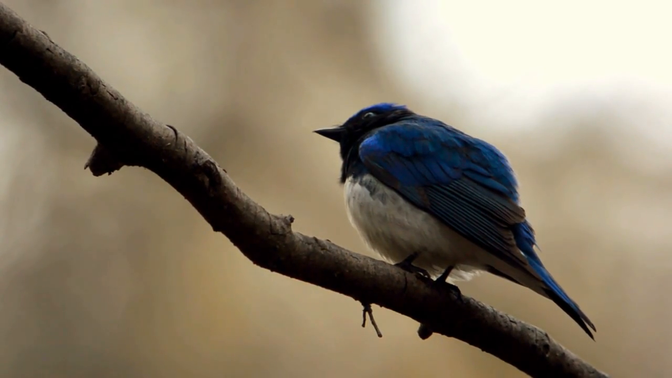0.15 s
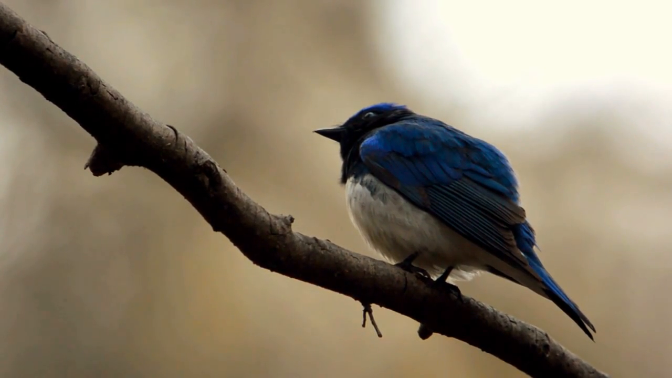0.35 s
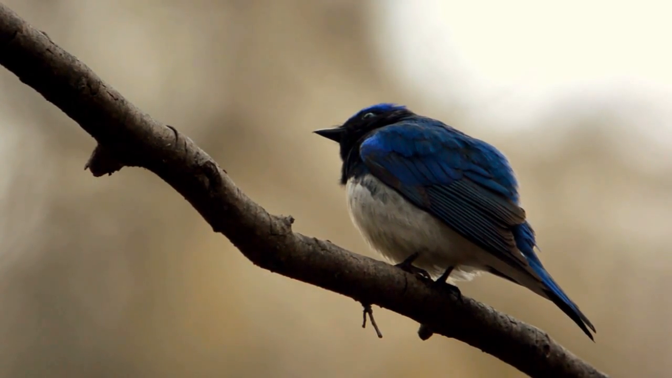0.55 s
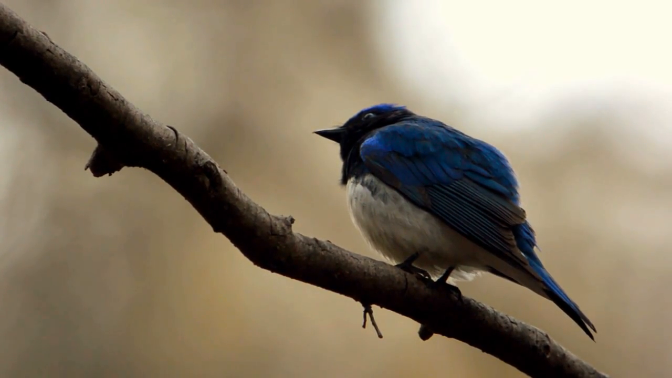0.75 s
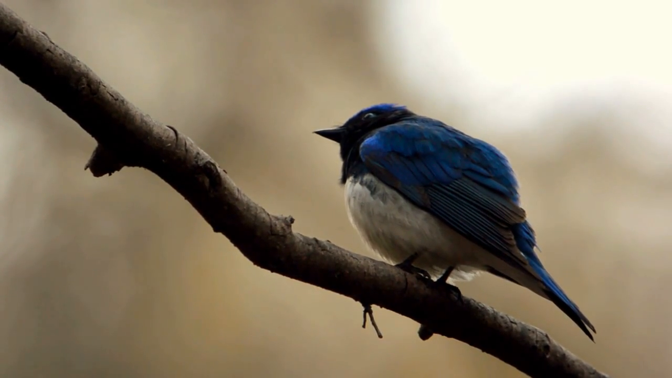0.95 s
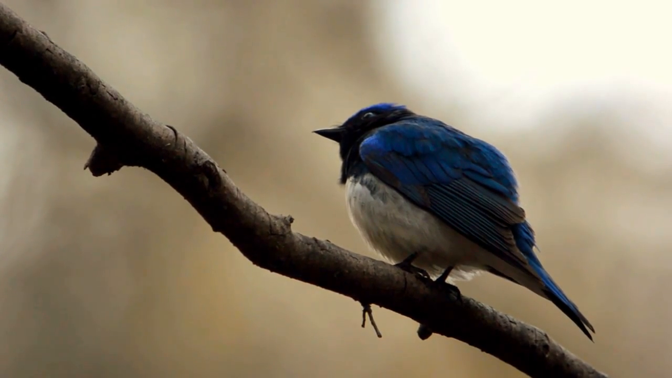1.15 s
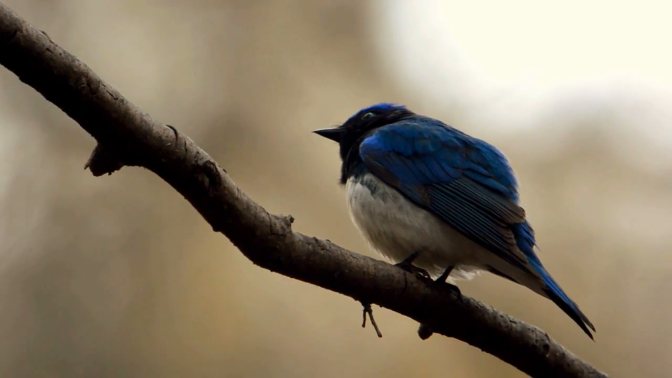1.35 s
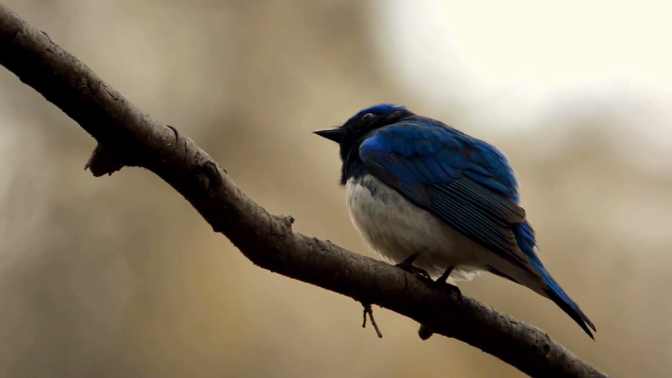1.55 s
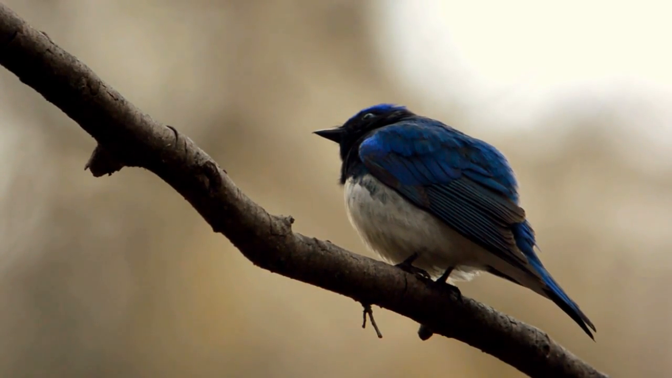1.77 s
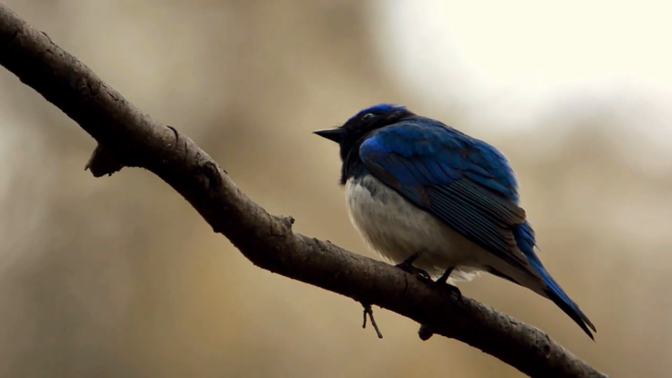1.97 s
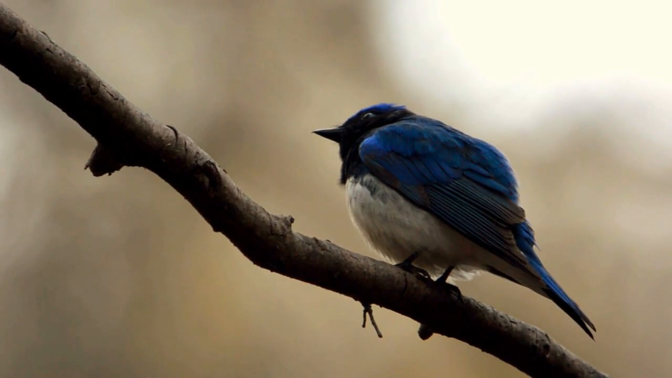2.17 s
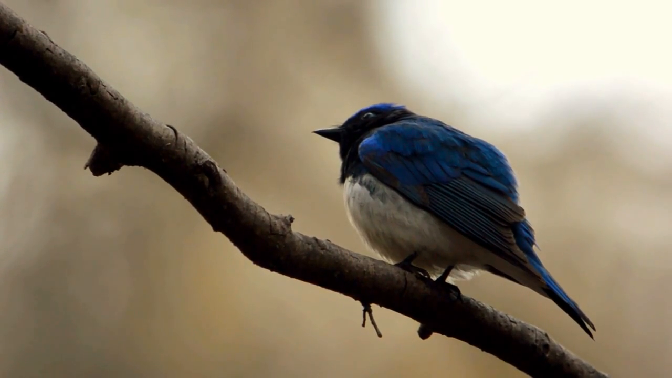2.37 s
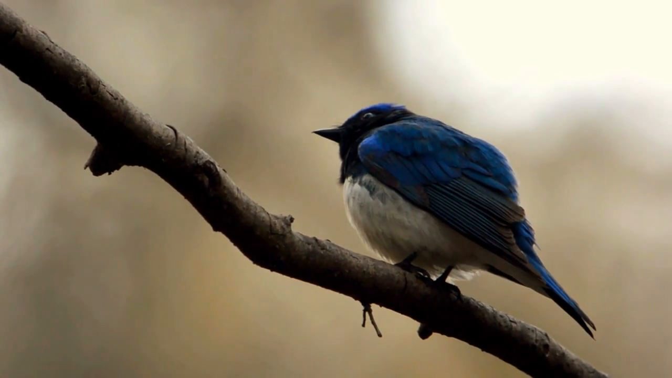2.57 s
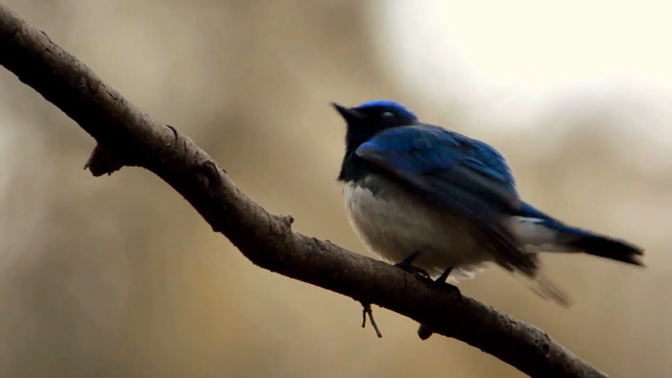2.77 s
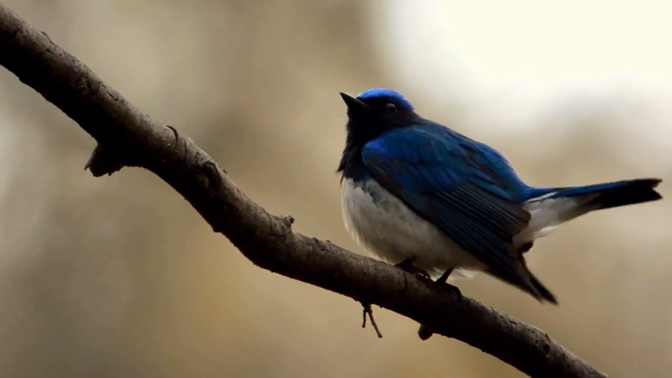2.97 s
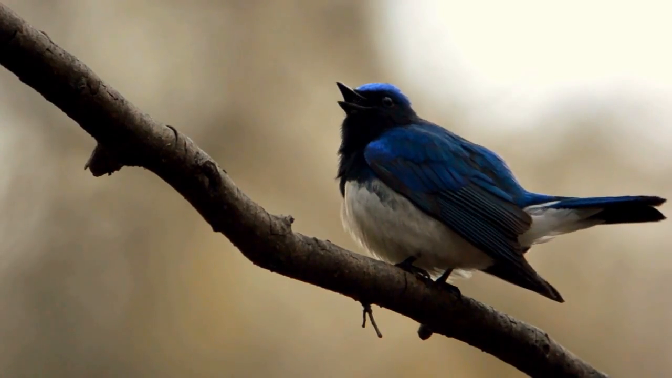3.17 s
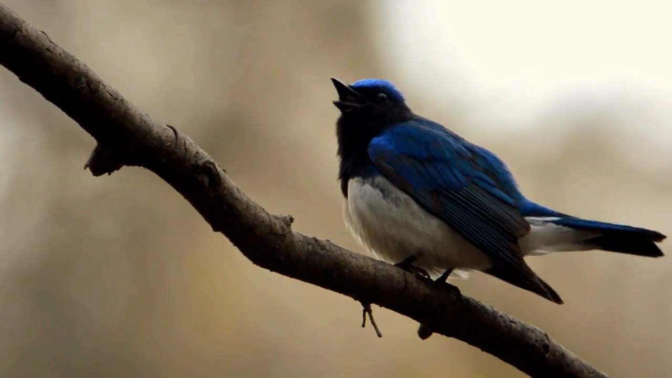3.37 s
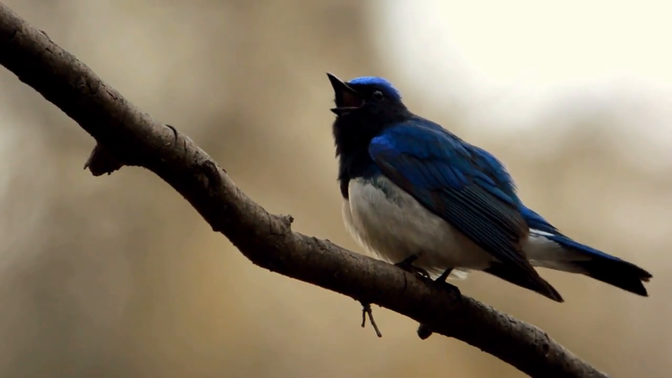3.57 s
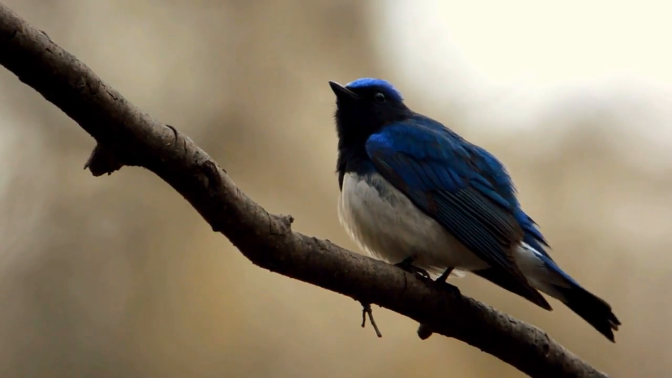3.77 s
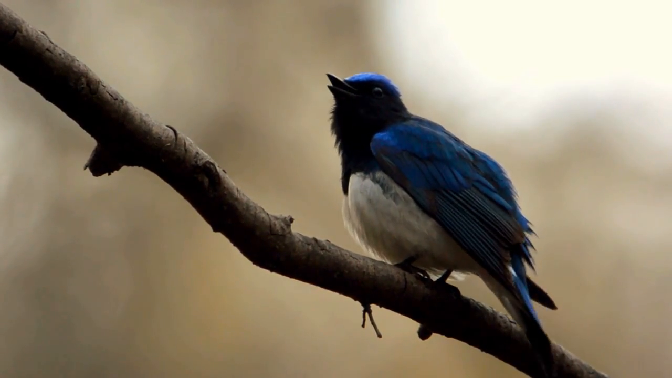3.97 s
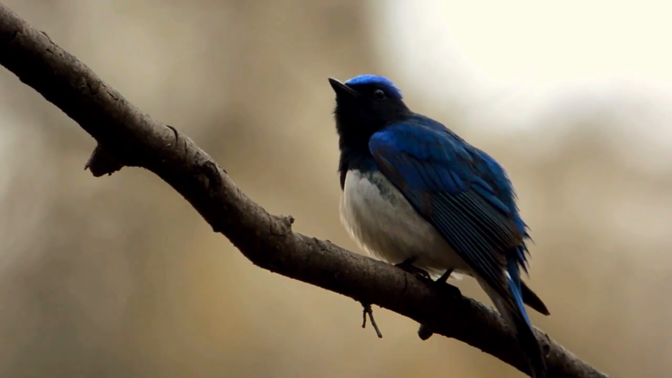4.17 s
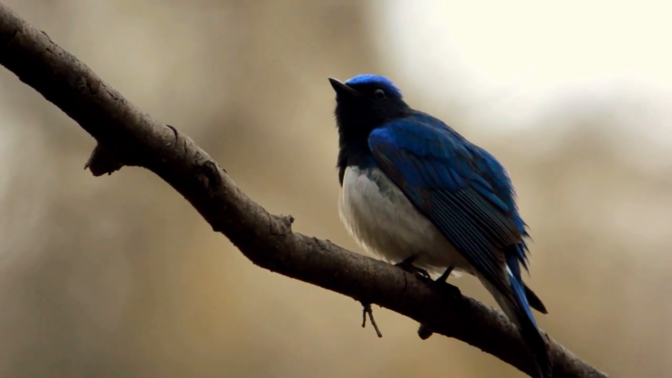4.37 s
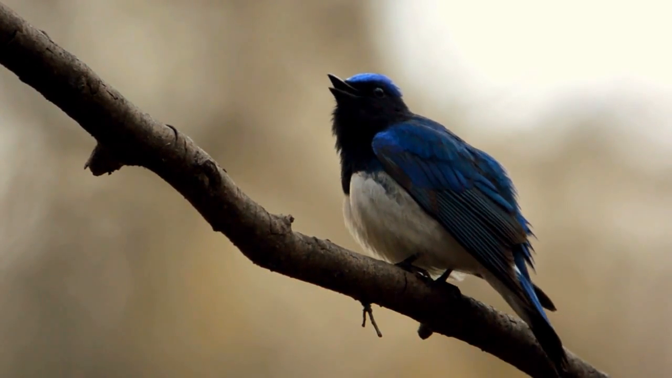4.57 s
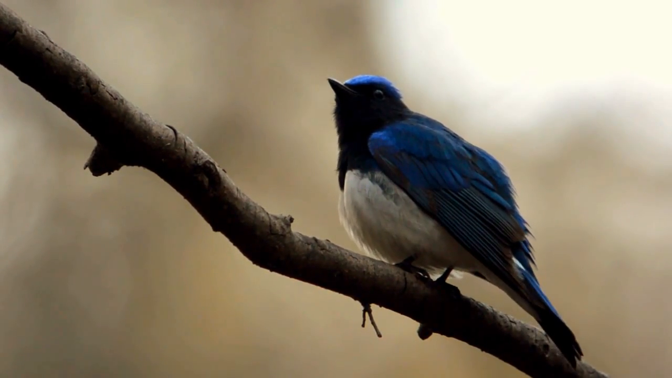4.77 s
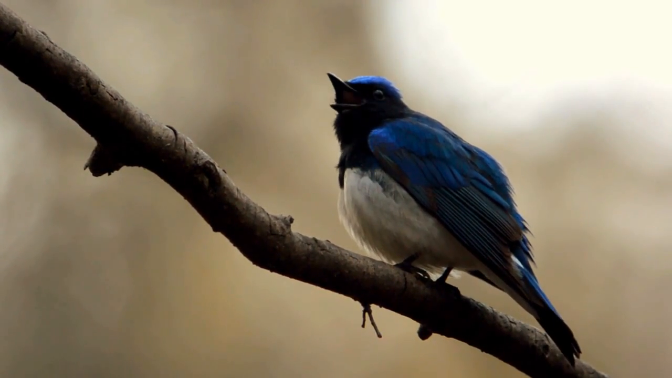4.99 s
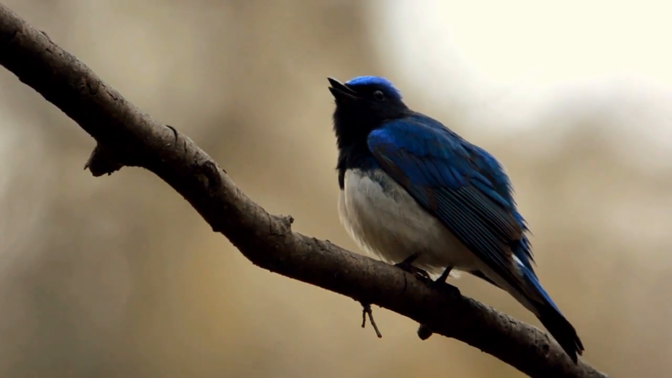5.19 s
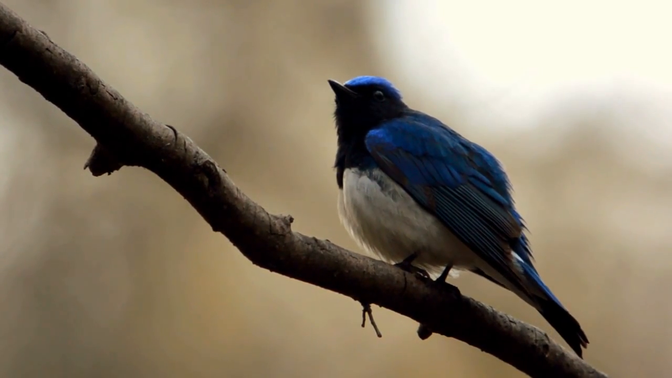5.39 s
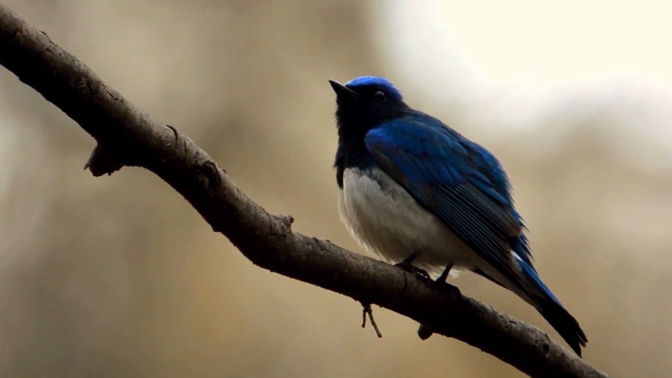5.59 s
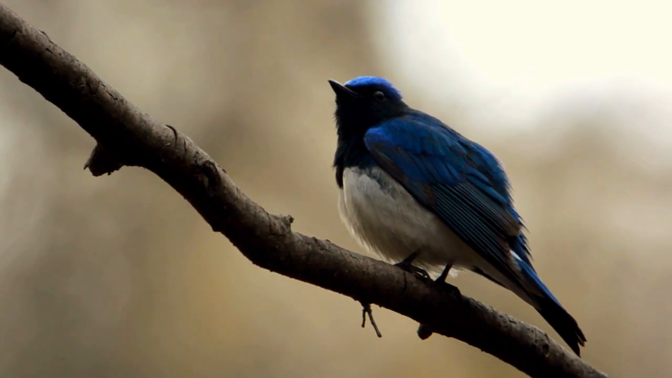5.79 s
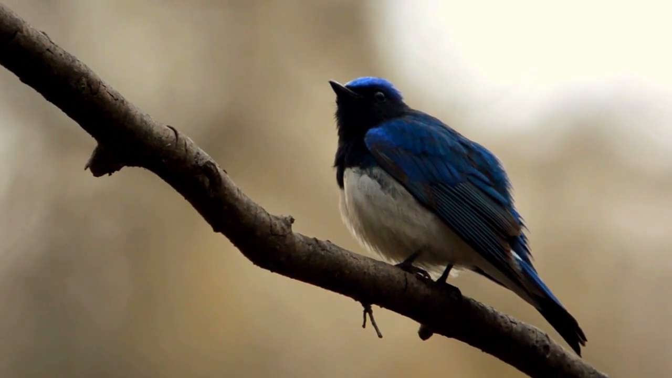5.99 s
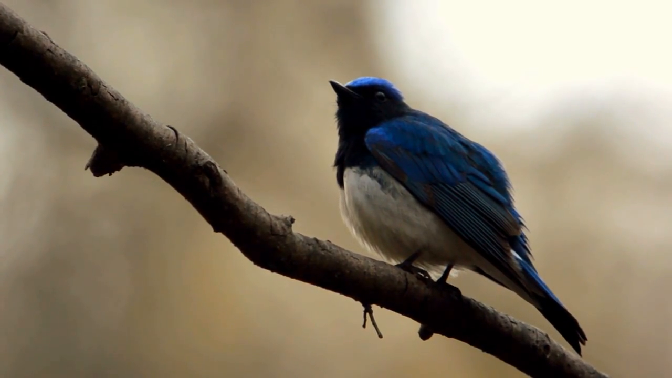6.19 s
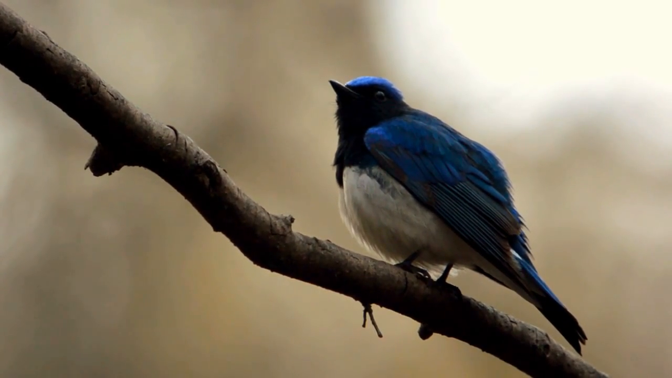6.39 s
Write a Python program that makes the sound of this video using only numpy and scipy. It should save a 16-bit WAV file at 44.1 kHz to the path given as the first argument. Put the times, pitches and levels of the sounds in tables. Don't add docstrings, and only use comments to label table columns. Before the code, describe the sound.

Outdoors in woodland, running water stays soft and constant, slightly to the right, its treble dulled by the microphone. Far birds whistle faintly, a nearer bird adds fast high loops and a rising buzz, and twigs tick. Then the closest bird sings loud and pure: three upward glides, two warbled pairs lower down, and a brief very high flutter with clicking bill, echoing off trunks.

```python
import sys
import numpy as np
from scipy import signal
from scipy.fft import rfft, irfft, next_fast_len
from scipy.io import wavfile
from scipy.ndimage import uniform_filter1d

SR = 44100
rng = np.random.default_rng(int(sys.argv[2]) if len(sys.argv) > 2 else 0)


def generate_wav(signal):
    frames = np.transpose(np.atleast_2d(signal))
    scaled = np.clip(frames, -1, 1) * 32767
    pcm = np.round(scaled).astype(np.int16)
    wavfile.write(sys.argv[1], SR, pcm)


def volts(x):
    e = np.asarray(x, float) / 20
    return 10 ** e


N = 284004

STREAM_LAG_MS = 0.11
NEIGHBOUR_LAG_MS = 0.095
SINGER_LAG_MS = -0.018
BOUNCE_S = 0.00434


def evened(x):
    return x / np.sqrt(np.mean(x ** 2) + 1e-20)


def wander(shape, samples):
    once = uniform_filter1d(rng.standard_normal(shape), samples)
    return evened(uniform_filter1d(once, samples))


def read(points, hz):
    f, value = np.transpose(points)
    return np.interp(np.log(hz + 1), np.log(f + 1), value)


def add(mix, s, sound, pan_db=0., lag_ms=0.):
    sound = np.pad(sound, (0, next_fast_len(len(sound) + 64) - len(sound)))
    delay = np.exp(-2j * np.pi * np.fft.rfftfreq(len(sound), 1 / SR) * lag_ms / 1000)
    left = irfft(rfft(sound) * delay, len(sound))
    pair = np.array([left * volts(pan_db / 2), sound * volts(-pan_db / 2)])
    part = mix[:, round(s * SR):][:, :len(sound)]
    part += pair[:, :part.shape[1]]


def curves(rows, smooth_s=0.0036):
    s, *columns = np.transpose(rows)
    t = np.arange(s[0], s[-1], 1 / SR)
    width = round(smooth_s * SR)
    return [uniform_filter1d(np.interp(t, s, c), width, mode="nearest") for c in columns]


def stroke(length, from_hz, to_hz, db, ends_db=-9):
    u = np.linspace(0, 1, round(length * SR))
    return from_hz + (to_hz - from_hz) * u, db + ends_db * (2 * u - 1) ** 2


def whistle(hz, db, second_db=-41, third_db=-39):
    a = 2 * np.pi * np.cumsum(hz) / SR
    tone = np.sin(a) + volts(second_db) * np.sin(2 * a) + volts(third_db) * np.sin(3 * a)
    soft_ends = signal.windows.tukey(len(a), min(1, 520 / len(a)))
    return np.sqrt(2) * volts(db) * tone * soft_ends


def resonate(x, hz, width):
    turn = np.exp(2j * np.pi * np.cumsum(hz * np.ones(len(x))) / SR)
    r = np.exp(-np.pi * width / SR)
    return 2 * (turn * signal.lfilter([1 - r], [1, -r], x / turn)).real


# (frequency [Hz], time to fade by 60 dB [s])
ECHO_TIMES = [(1000, 0.41), (3200, 0.95), (3800, 0.8), (4600, 0.75), (7000, 0.41)]


def forest(x, start_s, grow_s):
    taps = np.zeros((2, SR))
    slots = np.arange(0, SR - 20, 20)
    at = slots + rng.integers(0, 20, (2, len(slots)))
    np.put_along_axis(taps, at, rng.standard_normal(at.shape), 1)
    hz, t, z = signal.stft(taps, SR, nperseg=256)
    fade = volts(-60 * t / read(ECHO_TIMES, hz)[:, None])
    tail = signal.istft(z * fade, SR, nperseg=256)[1]
    t = np.arange(tail.shape[1]) / SR
    tail = tail * np.clip((t - start_s) / grow_s, 0, 1)
    tail = tail * (1 + 1.37 * np.exp(-t / 0.027))
    tail = tail / np.linalg.norm(tail, axis=1, keepdims=True)
    return signal.fftconvolve(x, tail, axes=1)[:, :N]


# (frequency [Hz], level [dB per Hz])
WATER_COLOUR = [(15, -38.5), (25, 1), (40, -26.5), (54, -28), (140, -34), (328, -25), (372, -24.5),
                (1050, -15), (1280, -17.5), (1860, -19), (3370, -21), (6910, -28), (9300, -34),
                (12100, -54.5), (20500, -120)]
# (frequency [Hz], likeness [-1 to 1])
LIKENESS = [(30, 0.53), (100, 0.41), (300, 0.55), (600, 0.83), (1500, 0.75), (3000, 0.67), (5000, 0.19),
            (9000, 0.26)]
# (frequency [Hz], left minus right [dB])
HISS_LEAN = [(60, -1), (170, 0), (470, -1), (1310, -0.5), (3660, -2.5), (10200, 2)]


def hiss():
    frames, hz = N // 256 + 5, np.fft.rfftfreq(1024, 1 / SR)
    a, b, c, d, patches = rng.standard_normal((frames, 513, 5)).T
    patches = evened(uniform_filter1d(uniform_filter1d(patches, 14, 0), 8, 1))
    same = np.clip(read(LIKENESS, hz), -1, 1)[:, None]
    later = np.exp(-2j * np.pi * hz * STREAM_LAG_MS / 1000)[:, None]
    right = a + 1j * b
    left = same * later * right + np.sqrt(1 - same ** 2) * (c + 1j * d)
    z = np.array([left, right])
    z *= volts(read(WATER_COLOUR, hz)[:, None] + 1.8 * patches)
    z *= volts(read(HISS_LEAN, hz)[:, None] * np.array([.5, -.5])[:, None, None])
    return evened(signal.istft(z, nperseg=1024, noverlap=768)[1][:, :N])


def bubble(hz, cycles, glide):
    u = np.arange(round(3 * cycles * SR / hz)) * hz / SR
    ring = np.sin(2 * np.pi * (u + glide * u ** 2 / (2 * cycles)))
    return ring * np.exp(-2.2 * u / cycles) * np.minimum(u / 1.2, 1)


def gurgle():
    out = np.zeros((2, N))
    for hz in np.geomspace(480, 2600, num=24):
        born = rng.random(N) < 22 / SR
        size = volts(5.05 * np.minimum(rng.exponential(1, N), 4)) * born
        train = signal.oaconvolve(size, bubble(hz, rng.uniform(6.9, 21.3), 0.11))[:N]
        level = volts(read(WATER_COLOUR, hz)) * np.sqrt(hz)
        add(out, 0, train * level, rng.normal(-.4, 1.2), STREAM_LAG_MS)
    return evened(out)


# (time [s], level [dB])
STREAM_FLOW = [(0.0, -51.5), (0.75, -51.5), (2.1, -52), (2.39, -51), (2.99, -52.5), (3.64, -51), (4.3, -52),
               (6.44, -51.5)]
# (time [s], peak level [dB], pitch [Hz])
LARGE_BUBBLES = [(0.378, -38, 1870), (0.41, -44, 674), (0.597, -39.5, 1040), (0.639, -26.5, 1890),
                 (0.863, -40, 1220), (0.899, -38, 990), (0.988, -39, 1210), (1.214, -38, 837),
                 (1.531, -41, 780), (1.685, -42, 837), (1.743, -40.5, 860), (2.254, -38.5, 725),
                 (2.441, -38.5, 770), (2.47, -35.5, 995), (2.728, -42, 950), (2.92, -42, 763),
                 (3.402, -39, 727), (3.712, -39.5, 816), (3.752, -38, 1026), (4.147, -39, 700),
                 (4.277, -33.5, 980), (4.572, -35.5, 1580), (4.882, -34.5, 1420), (5.055, -39.5, 1423),
                 (5.215, -39, 840), (5.588, -39.5, 818), (5.801, -34, 750), (5.97, -37, 1670),
                 (6.182, -37, 946), (6.29, -37, 1095)]


def stream():
    s, db = np.transpose(STREAM_FLOW)
    swell = volts(np.interp(np.arange(N) / SR, s, db))
    out = swell * (volts(0.38) * hiss() + volts(-6.0) * gurgle())
    pans_db = rng.normal(-.4, 1.2, len(LARGE_BUBBLES))
    for (s, db, hz), pan_db in zip(LARGE_BUBBLES, pans_db):
        add(out, s, volts(db - 3.0) * bubble(hz, 13.9, 0.05), pan_db, STREAM_LAG_MS)
    return out


# (time [s], length [s], start pitch [Hz], end pitch [Hz], level [dB])
FAR_WHISTLES = [(.482, 0.063, 3867, 3806, -53.5), (.56, 0.18, 3790, 3755, -61),
                (0.823, .07, 5170, 4010, -57), (0.905, 0.096, 4710, 4300, -59.5),
                (0.991, .05, 4270, 4500, -62), (1.058, 0.056, 4600, 4800, -57),
                (1.129, 0.046, 4400, 3980, -59), (1.177, 0.064, 4470, 5100, -58),
                (1.223, 0.038, 3130, 3100, -57), (1.437, .03, 4620, 4620, -64),
                (1.436, 0.052, 3570, 3620, -56.5), (1.519, 0.031, 3580, 3620, -63),
                (1.66, 0.054, 3760, 3684, -60.5), (1.735, .04, 2496, 2450, -57.5),
                (3.943, 0.062, 3950, 3790, -57), (3.95, 0.062, 4330, 4020, -57)]


def far_birds():
    out = np.zeros((2, N))
    flicker_db = 3.4 * wander((2, N), 500)
    for s, *syllable in FAR_WHISTLES:
        hz, db = stroke(*syllable, ends_db=-3.5)
        glide_speed = abs(hz[-1] - hz[0]) / syllable[0]
        rough_hz = 8 + 0.0058 * glide_speed
        add(out, s, whistle(hz + rough_hz * wander(len(hz), 120), db, third_db=-60), -.6, -.063)
    return out * volts(flicker_db)


def buzz():
    length_s, swings_hz = 0.43, 185
    t = np.arange(0, length_s, 1 / SR)
    u = t / length_s
    low_hz = 4140 + 1556 * u ** 1.7
    span_hz = 2420 * (0.4 + 0.75 * np.minimum(u / .46, 1))
    edges_db = -11 * np.maximum(1 - np.minimum(t, t[::-1]) / 0.088, 0)
    uneven = evened(uniform_filter1d(rng.standard_normal(len(t)), 200))
    turns = np.cumsum(swings_hz * (0.5 + 0.11 * uneven)) / SR
    height = np.sin(np.pi * turns) ** 2
    db = -47 + 7.5 * u + edges_db - 13.5 * height + 1.9 * wander(len(t), 600)
    return whistle(low_hz + span_hz * height, db, second_db=-62, third_db=-60)


# (time [s], length [s], start pitch [Hz], end pitch [Hz], level [dB])
NEIGHBOUR_WHISTLES = [(1.746, 0.034, 5760, 5730, -43), (1.786, .016, 5750, 6260, -45),
                      (1.8, .09, 5750, 5780, -63), (1.805, .025, 6500, 6900, -53),
                      (1.83, .05, 6900, 6750, -61), (1.88, 0.047, 6650, 6170, -54),
                      (1.903, 0.0435, 6200, 5680, -40.5), (2.041, 0.027, 4900, 4300, -43),
                      (2.067, .022, 4500, 5700, -45.5), (2.083, 0.043, 5550, 5730, -41),
                      (2.115, 0.0347, 5600, 6300, -42), (2.142, 0.022, 6700, 8000, -53),
                      (2.175, 0.064, 5700, 5550, -50), (2.218, 0.047, 5350, 4720, -40.5),
                      (3.45, 0.038, 5400, 5300, -54)]


def neighbour():
    out = np.zeros((2, N))
    for s, *syllable in NEIGHBOUR_WHISTLES:
        add(out, s, whistle(*stroke(*syllable, ends_db=-2.5), third_db=-63), 1.2, NEIGHBOUR_LAG_MS)
    add(out, 2.3, buzz(), 1.5, NEIGHBOUR_LAG_MS)
    return out


# (time [s], length [s], centre pitch [Hz], level [dB], left minus right [dB])
RUSTLE_PUFFS = [
    (2.25, 0.091, 1760, -49.5, -2),
    (5.93, 0.18, 1630, -56.5, -4),
    (4, 0.12, 4000, -61, 5.5),
    (4.6, 0.4, 3000, -53.5, -2),
]


def rustles():
    out = np.zeros((2, N))
    for s, length, hz, db, pan_db in RUSTLE_PUFFS:
        width = 300 * (hz / 1000) ** 1.6
        chance, size = rng.random((round(length * SR), 2)).T
        clicks = (chance < 900 / SR) * np.log(size + 1e-3) * np.sign(chance - 450 / SR)
        puff = evened(resonate(resonate(clicks, hz, width), hz, width))
        add(out, s, volts(db) * puff * np.hanning(len(clicks)) ** 0.5, pan_db, .06)
    return out


# (time [s], peak level [dB], centre pitch [Hz], left minus right [dB])
BILL_SNAPS = [(3.56, -34.5, 4850, -3), (4.88, -40.5, 4890, -2), (4.9, -40.5, 5200, 0.5),
              (4.912, -42, 7400, -1), (4.948, -38.5, 5600, 3), (5.056, -33.5, 2880, -12),
              (5.077, -35.5, 4900, -1), (5.121, -37.5, 6000, 0.5), (5.257, -34, 3300, -8),
              (5.279, -36, 5200, 3), (5.32, -40, 6000, 1)]
# (time [s], peak level [dB], centre pitch [Hz], left minus right [dB])
TWIG_TICKS = [(.295, -40.5, 3320, -8), (.378, -50, 4500, 3), (.465, -45, 6700, 6), (0.577, -45, 7040, 8),
              (.64, -39, 2170, -3), (.705, -43, 4500, 4), (.909, -41, 6700, -2), (.98, -46, 5570, -1),
              (1.725, -43.5, 8250, 1.5), (1.9, -54, 4900, 3), (2.079, -45.5, 9000, -7),
              (2.286, -52, 9300, -2), (2.59, -52, 9300, -1), (2.87, -44.5, 3290, 0)]


def snaps():
    out, t = np.zeros((2, N)), np.arange(400) / SR
    for rows, width_hz in (BILL_SNAPS, 2600), (TWIG_TICKS, 1500):
        for s, db, hz, pan_db in rows:
            burst = rng.standard_normal(len(t)) * volts(-60 * t / 0.012)
            click = resonate(resonate(burst, hz, width_hz), hz, width_hz)
            add(out, s, volts(db) * click / abs(click).max(), pan_db, .03)
    return out


# (time [s], pitch [Hz], level [dB])
THIN_NOTES = [
    [(5.022, 6730, -64), (5.045, 6820, -43), (5.073, 6700, -34), (5.082, 6750, -53)],
    [(5.091, 6800, -33.5), (5.119, 6890, -38.5), (5.137, 6795, -35), (5.15, 6860, -48.5),
     (5.197, 6690, -41), (5.215, 7050, -58), (5.26, 7160, -57.5), (5.33, 6860, -59.5)],
]
# (time [s], length [s], start pitch [Hz], end pitch [Hz], level [dB])
CHIP_GLIDES = [
    (5.116, 0.018, 3280, 4960, -45.5),
    (5.181, .019, 3480, 5280, -43),
    (5.249, .017, 3600, 5310, -47.5),
    (5.204, 0.0072, 8200, 6860, -46),
    (5.262, .009, 8140, 7500, -48),
    (5.278, 0.0078, 8200, 7000, -51.5),
]


def high_figure():
    out = np.zeros((2, N))
    start = THIN_NOTES[0][0][0]
    hz, db = curves(THIN_NOTES[0] + THIN_NOTES[1])
    since_break = np.maximum(start + np.arange(len(hz)) / SR - 5.118, 0)
    depth_hz = 467 * (1 - np.exp(-since_break / 0.057))
    place = (np.cumsum(46 * (1 + 0.034 * wander(len(hz), 250))) / SR + 0.52) % 1
    fall = uniform_filter1d(1 - 2 * place, 60)
    gaps_db = depth_hz / 330 * 14 * (np.sin(np.pi * place) ** 0.7 - 1)
    note = whistle(hz + depth_hz * fall, db + gaps_db, second_db=-12.5)
    add(out, start, note, 7.5, .036)
    add(out, start + 0.024, volts(-10.5) * note, -5.5, .1)
    for s, length, from_hz, to_hz, db in CHIP_GLIDES:
        glide = np.linspace(from_hz, to_hz, round(length * SR))
        chip = whistle(glide, db, second_db=-19.5, third_db=-58)
        add(out, s, chip * np.hanning(len(glide)) ** 0.28, -1.5, SINGER_LAG_MS)
    return out


# (time [s], level [dB], first dip [Hz], second dip [Hz], third dip [Hz])
WARBLED_NOTES = [
    (4.017, -30, 289, 615, 60.3),
    (4.131, -27, 314, 690, 200),
    (4.577, -30.5, 684, 920, 655),
    (4.692, -29, 585, 875, 297.5),
]
# (rise time [s], start pitch [Hz], top pitch [Hz], warble period [s], length [periods])
PAIR_SHAPES = [
    (.036, 2613, 3717, .0197, 3.2),
    (0.037, 2470, 3847, 0.017, 2.2),
]
WARBLED_PANS = [-2.5, -5, -2, -3]


def warbled():
    out = np.zeros((2, N))
    for k, ((s, db, *dips_hz), pan_db) in enumerate(zip(WARBLED_NOTES, WARBLED_PANS)):
        rise, start_hz, top_hz, period, length = PAIR_SHAPES[k % 2]
        t = np.arange(-rise, length * period, 1 / SR)
        depth = np.array(dips_hz + [0])[np.clip(t // period, 0, 3).astype(int)]
        dip = np.interp(t / period % 1, [0, .12, .48, .95], [0, 0, 1, 0]) ** 1.306
        climb = (top_hz - start_hz) * abs(t / rise) ** 1.2
        under = uniform_filter1d(np.where(t < 0, climb, depth * dip), 90)
        dropping_db = -6 * np.maximum(np.gradient(under), 0) * SR / 200000.0
        fading_db = -70 * np.maximum(t - .025, 0) - 900 * np.maximum(t - t[-1] + 0.0087, 0)
        note = whistle(top_hz - under, db - 0.013 * under + dropping_db + fading_db, third_db=-27.5)
        add(out, s, note, pan_db, SINGER_LAG_MS)
        add(out, s + BOUNCE_S, volts(-14.5) * note, pan_db - 4.0, SINGER_LAG_MS + 0.023)
        add(out, s + .0245, volts(-11.5) * note, pan_db + 7.5, SINGER_LAG_MS + 0.13)
    return out


# (time [s], pitch [Hz], level [dB])
RISING_NOTES = [
    [(3.243, 4050, -44), (3.27, 4033, -31.5), (3.295, 4147, -33.5), (3.34, 4356, -27.5),
     (3.38, 4610, -26.5), (3.395, 4800, -50)],
    [(3.467, 3960, -47), (3.474, 4033, -31), (3.5, 4185, -28), (3.53, 4360, -24), (3.561, 4580, -26.5),
     (3.566, 4700, -46)],
    [(3.635, 4110, -39), (3.655, 4373, -29), (3.68, 4620, -26), (3.7, 4810, -26.5), (3.715, 5150, -32.5),
     (3.722, 5350, -53)],
]
# (left minus right [dB], ground bounce level [dB])
ARRIVALS = [
    (-2.5, -7),
    (-1, -11),
    (-2, -7),
]


def rising():
    out = np.zeros((2, N))
    for rows, (pan_db, bounce_db) in zip(RISING_NOTES, ARRIVALS):
        start, note = rows[0][0], whistle(*curves(rows))
        add(out, start, note, pan_db, SINGER_LAG_MS)
        add(out, start + BOUNCE_S, volts(bounce_db) * note, pan_db, SINGER_LAG_MS)
    return out


def scene():
    water, far, other = stream(), far_birds(), neighbour()
    figure = high_figure() + snaps() + rustles()
    warbles, glides = warbled(), rising()
    scattered = volts(-5.5) * glides + volts(-6.5) * warbles + volts(-3.5) * figure
    scattered = scattered + volts(-1.5) * far + volts(-4.0) * other
    direct = glides + warbles + figure + volts(-1.5) * far + other
    return direct + forest(scattered, 0.0017, 0.0043) + water


def band_limit(x):
    return signal.sosfilt(signal.butter(12, 14300, fs=SR, output="sos"), x)


# (frequency [Hz], level [dB])
TREBLE_END = [(9000, 1.5), (9550, -2.5), (9950, -41), (10250, -44), (10450, 1), (11000, -1), (11400, -37.5),
              (11900, -3)]


def record(dry):
    f, db = np.transpose(TREBLE_END)
    size = next_fast_len(N)
    response = volts(np.interp(np.fft.rfftfreq(size, 1 / SR), f, db))
    cut = irfft(rfft(dry, size) * response, size)[:, :N]
    return band_limit(cut + 0.0025)


dry = scene()
out = record(dry)
generate_wav(out)
```